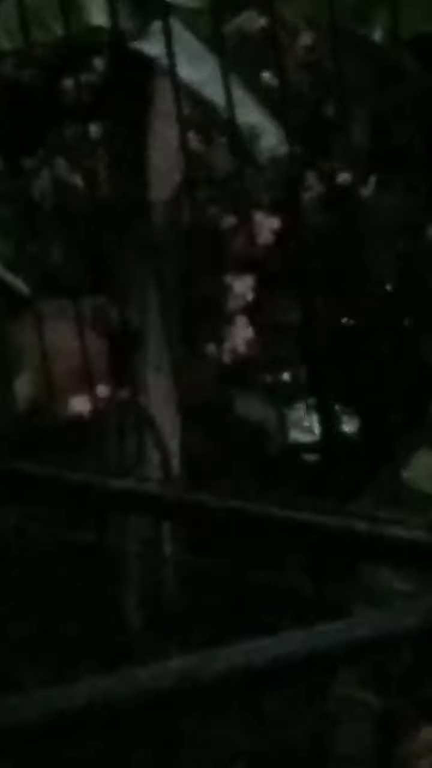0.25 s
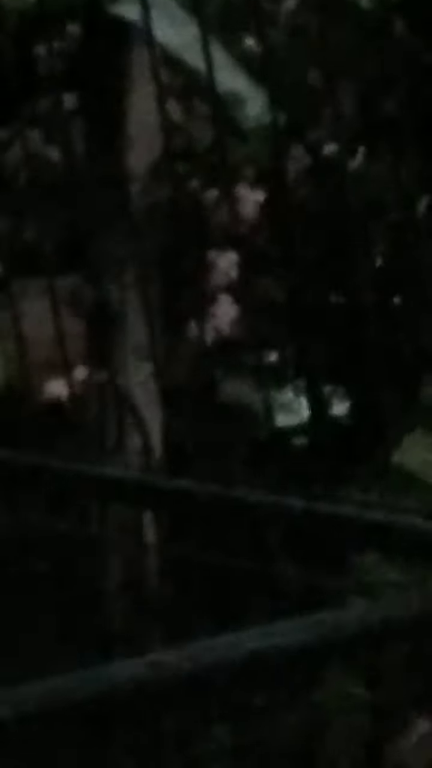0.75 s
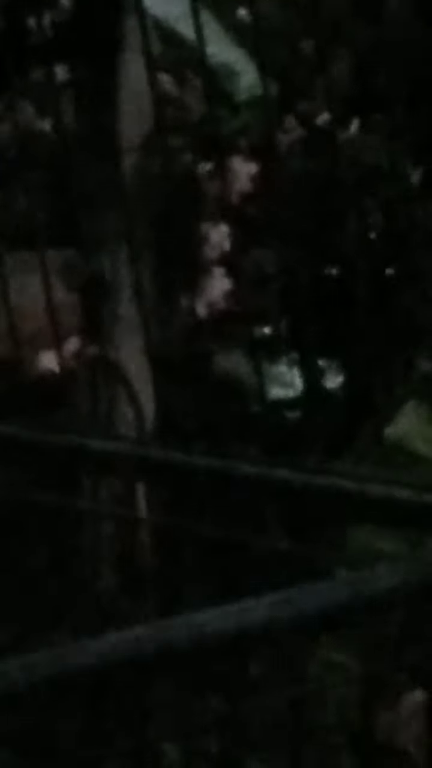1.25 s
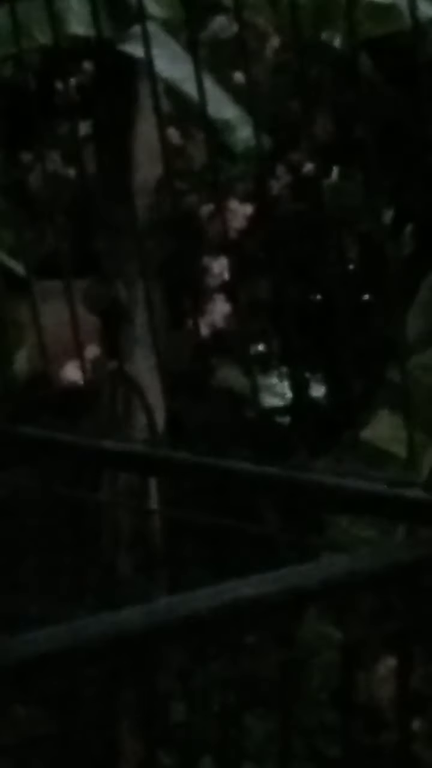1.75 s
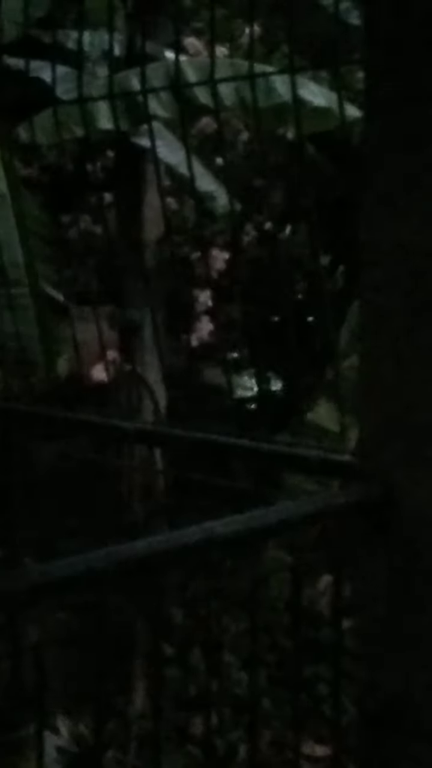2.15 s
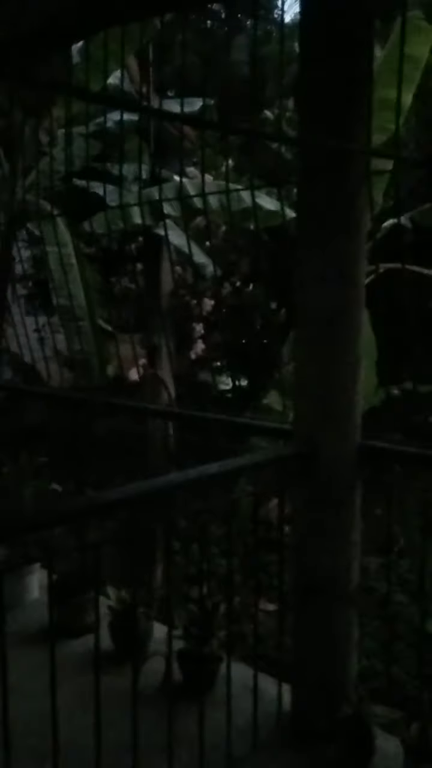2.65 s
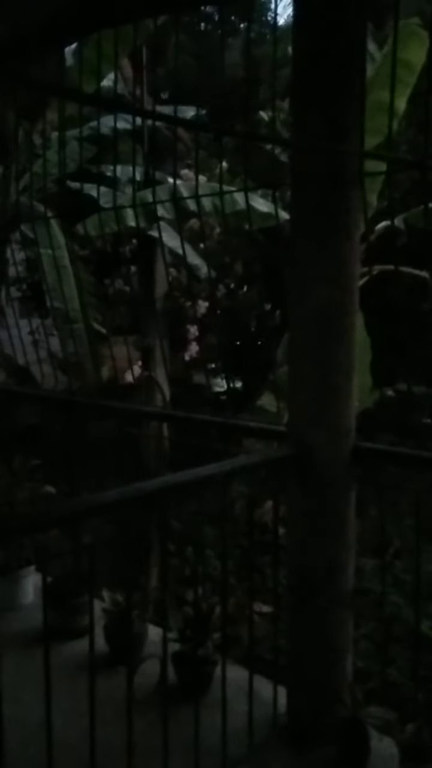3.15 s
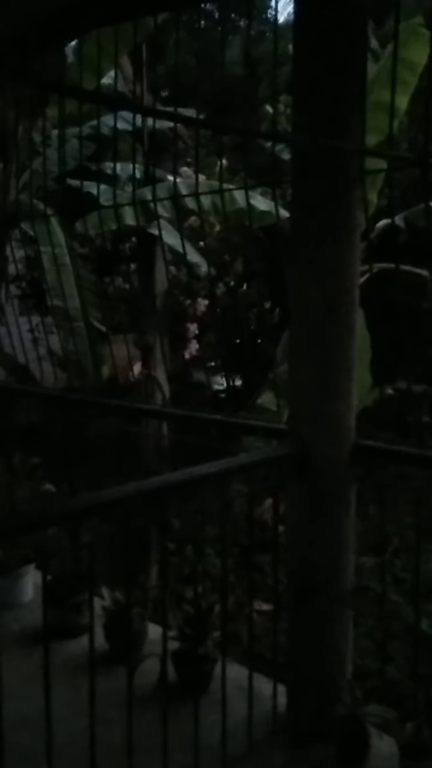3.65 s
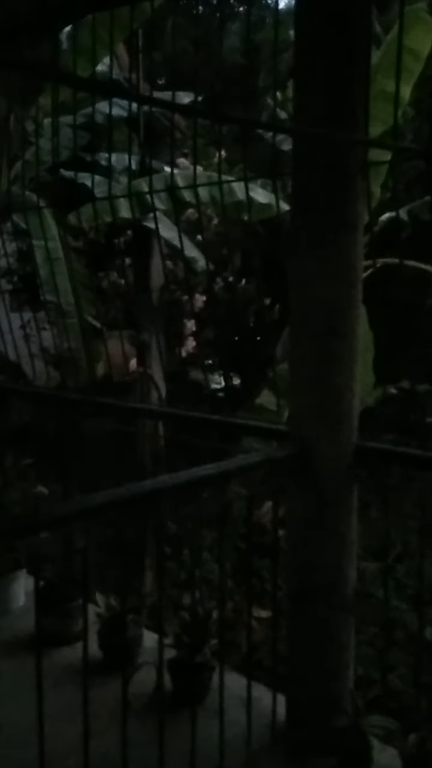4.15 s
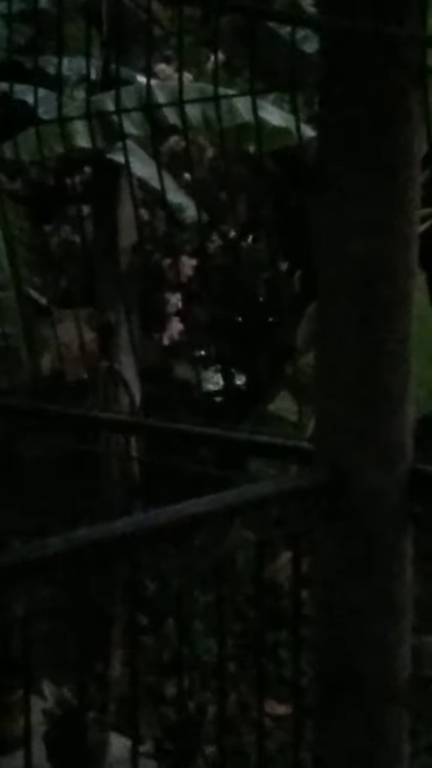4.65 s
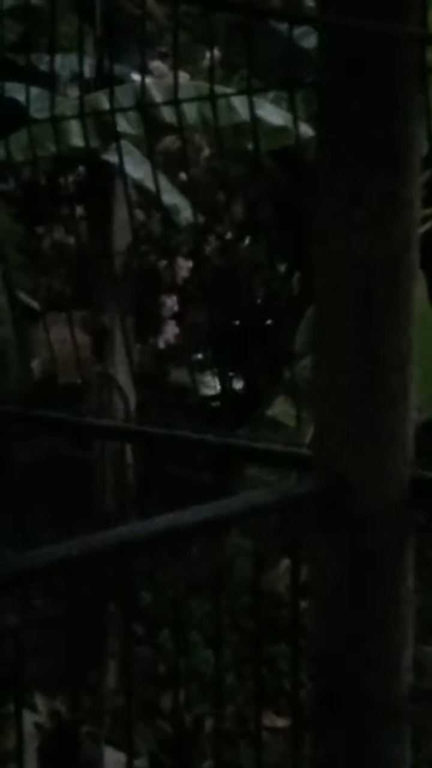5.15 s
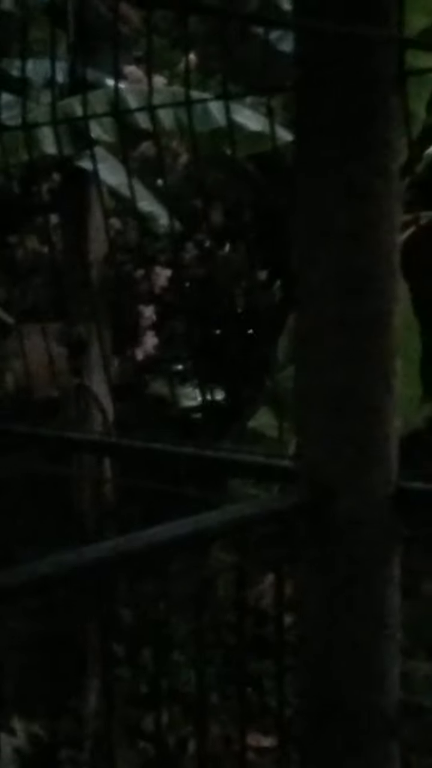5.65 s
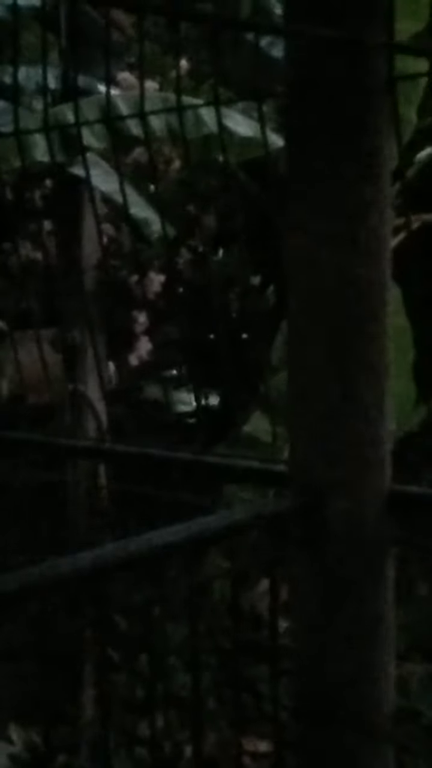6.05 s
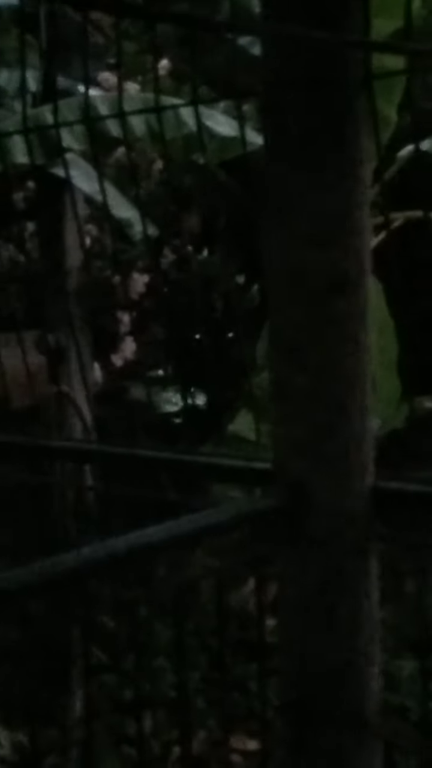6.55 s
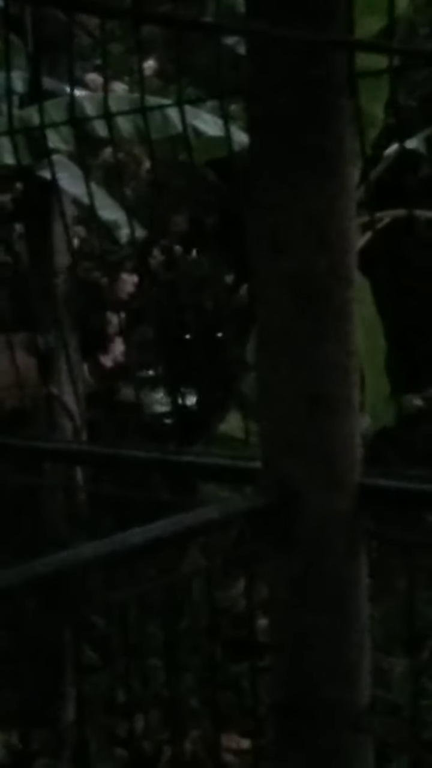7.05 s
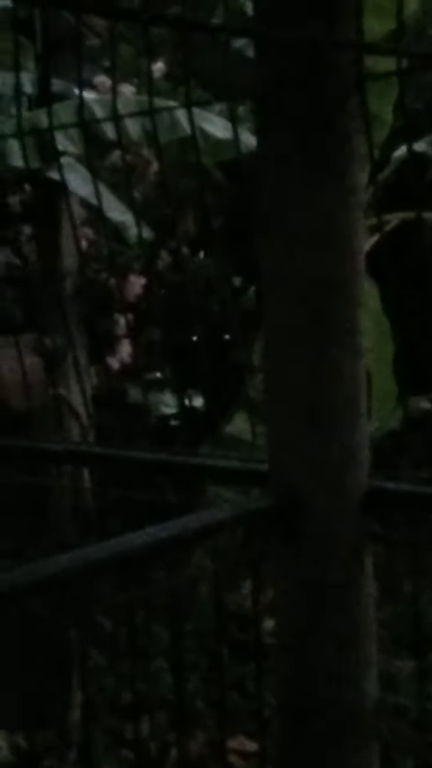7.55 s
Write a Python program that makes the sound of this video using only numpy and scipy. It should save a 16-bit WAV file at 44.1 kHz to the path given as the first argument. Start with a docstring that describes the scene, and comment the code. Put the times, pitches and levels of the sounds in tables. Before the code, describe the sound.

A soft wet wash, a breathy high hum and a fine patter of far drips run throughout, outdoors in a leafy garden at dawn, heard from a porch. From 0 s, near drops fall irregularly: bright splats with tiny scattered droplets, a strong one at 0.25 s and more from 0.6 to 1 s, mixed with dull leaf pats and short ringing puddle plops. Splats continue around 1.8, 2.0 and 2.6 s, then 3.3 to 3.9 s. The loudest event is a tight cluster of sharp splats at about 4.26 s, followed by leaf knocks near 4.7 s. Between 5.1 and 5.8 s it is sparser, with small plops. Moderate splats return at 5.9 s, and from 6.4 s to the end lighter, more echoing drops tick quickly. The hum swells gently near 0.6, 4.6, 6.4 and 7.1 s; the wash eases slightly. Walls give every drop a brief reflection.

```python
"""A soft wet wash and a high, breathy, swelling hum run throughout, together with a patter of far drips.
Close to the porch, drops splat brightly on wet surfaces, pat on broad leaves and plop into puddles;
the porch walls answer each one. It is a garden at dawn, dripping from wet leaves and eaves.
Wash and hum are filtered noise; splats are resonant clicks; plops, pats and most far drips are damped
tones. Each drip carries a random echo of its own spot."""
import sys
import numpy as np
from scipy import signal
from scipy.fft import rfft, irfft, next_fast_len
from scipy.io import wavfile
from scipy.ndimage import uniform_filter1d, map_coordinates

SR = 44100
rng = np.random.default_rng(int(sys.argv[2]) if len(sys.argv) > 2 else 0)


def pcm_store(signal):
    """Save signal as 16-bit PCM."""
    levels = np.round(np.clip(np.atleast_2d(signal), -1, 1) * 32767)
    wavfile.write(sys.argv[1], SR, levels.astype(np.int16).T)


N = 344421

# colour of the far drips, before the shared ringing: [f/Hz, relative level/dB]
FAR_COLOUR = [(1000, -22), (2800, -1.5), (4200, -9), (4900, -8), (6000, -4.5), (7000, 4.5), (8300, 0.5),
              (9200, -3.5), (11300, -13.5), (12200, -46), (15500, -33)]


def amp(db):
    """Decibels to gain."""
    return 10 ** (np.asarray(db) / 20)


def unit(x):
    """Scale to rms 1."""
    return x / np.sqrt(np.mean(x ** 2) + 1e-20)


def along(points, hz):
    """Read (f/Hz, value) points on a log frequency axis."""
    f, value = np.transpose(points)
    return np.interp(np.log(hz + 1), np.log(f + 1), value)


def wobble(rate):
    """A smooth random curve with this many knots a second."""
    knots = rng.standard_normal(int(N * rate / SR) + 4)
    return map_coordinates(knots, [np.arange(N) * rate / SR])


def filtered(x, response):
    """Multiply the spectrum of x by a response of frequency."""
    size = next_fast_len(len(x) + 8192)
    spectrum = rfft(x, size) * response(np.fft.rfftfreq(size, 1 / SR))
    return irfft(spectrum, size)[:len(x)]


def add(track, s, sound):
    """Mix a sound into the track from time s."""
    part = track[max(round(s * SR), 0):][:len(sound)]
    part += sound[:len(part)]


def air():
    """The soft wash of the wet garden: coloured noise that wavers slightly and slowly eases off."""
    # colour of the far wet garden: [f/Hz, relative level/dB per Hz]
    air_colour = [(20, -21), (45, -8.5), (70, 0), (110, -1), (230, -5.5), (400, 1), (800, -4), (1500, -3.5),
                  (2900, -6), (4200, -7.5), (4900, -10), (7900, -2.5), (11300, -21.5), (12300, -31),
                  (15500, -26)]
    start_db, fade_db_per_s = -56, 0.42
    wash = unit(filtered(rng.standard_normal(N), lambda hz: amp(along(air_colour, hz))))
    return wash * amp(start_db - fade_db_per_s * np.arange(N) / SR + 0.71 * wobble(20))


def hum():
    """Noise sings in narrow resonances; mainly the lower ones swell together, and each flutters alone."""
    # resonances: [f/Hz, nominal width/Hz, level/dB before swell and flutter, share of the swells]
    resonances = [(1438, 71, -65, 1.05), (1715, 30, -70, 1.66), (2029, 98, -60.5, 1.07),
                  (2449, 73, -56, 0.053), (4166, 250, -69, 0.16), (6400, 29, -77, 0.25)]
    # slow swells, of which only the departure from the mean counts: [t/s, level/dB]
    swell_points = [(0.0, -59.5), (0.63, -54.5), (0.85, -59.5), (2.17, -60), (2.58, -58.5), (3.26, -60),
                    (3.69, -60), (4.58, -54.5), (5.28, -58), (5.52, -64.5), (6.41, -55), (6.73, -57.5),
                    (7.13, -55), (7.8, -58.5)]
    out = np.zeros(N)
    level_db = np.interp(np.arange(N) / SR, *np.transpose(swell_points))
    swell_db = level_db - level_db.mean()
    for centre, width, db, share in resonances:
        band = filtered(rng.standard_normal(N),
                        lambda hz: (1 + ((hz - centre) / (1.08 * width)) ** 2) ** -1.5)
        drift_db = 2.1 * wobble(6)
        flutter_db = 4.03 * wobble(24)
        out += unit(band) * amp(db + share * (swell_db + drift_db) + flutter_db)
    return out


def click(colour, ripple_db, ripple_hz, size=1024):
    """A causal pulse of (f/Hz, level/dB) colour with random resonances about ripple_hz apart."""
    hz = np.fft.rfftfreq(size, 1 / SR)
    curve = map_coordinates(rng.standard_normal(size), [hz / ripple_hz], mode="mirror")
    ripple = amp(ripple_db * np.tanh(curve))
    ripple /= np.sqrt(uniform_filter1d(ripple ** 2, size=41))  # resonances only regroup the energy nearby
    # folding the cepstrum forward in time gives minimum phase
    cepstrum = irfft(np.log(amp(along(colour, hz)) * ripple))
    fold = 1 + np.sign(size / 2 - np.arange(size))
    fold[0] = 1
    return irfft(np.exp(rfft(cepstrum * fold)))


def ring(hz, cycles, glide):
    """A damped tone that lives a few cycles while its pitch glides by a fraction of itself."""
    t = np.arange(SR // 20) / SR
    age = hz * t / cycles
    pitch = hz * (1 + glide * (1 - np.exp(-age)))
    envelope = np.exp(-age) * (1 - np.exp(-6 * age))
    return np.sin(2 * np.pi * np.cumsum(pitch) / SR) * envelope


def porch(sound, early_db, early_t60, tail_db, count=8):
    """Echoes of the sound's own spot: a few walls, scatter off leaves and rails, a diffuse tail."""
    # how long the diffuse tail lasts: [f/Hz, t60/s]
    tail_t60 = [(300, 0.28), (2000, 0.27), (7000, 0.24), (13000, 0.38)]
    t = np.arange(SR // 3) / SR
    hz, frames, z = signal.stft(rng.standard_normal(len(t)), SR, nperseg=256)
    decay = amp(-60 * frames / along(tail_t60, hz)[:, None])
    tail = signal.istft(z * decay, SR, nperseg=256)[1][:len(t)]
    tail *= 1 - np.exp(-t / 0.0023)  # the tail builds up softly
    early = rng.standard_normal(len(t))
    walls = (rng.uniform(.003, .024, count) * SR).astype(int)  # delays of 3 to 24 ms
    early[walls] += 8 * rng.standard_normal(count)
    early *= amp(-60 * t / early_t60)
    echo = amp(early_db) * early / np.linalg.norm(early) + amp(tail_db) * tail / np.linalg.norm(tail)
    echo[0] += 1  # the direct sound
    return signal.fftconvolve(sound, echo)


def ringing(hz):
    """Causal response that lifts and prolongs a few fixed pitches."""
    # ringing that the bright drips share: [f/Hz, width/Hz, level/dB over the direct sound]
    modes = [(3540, 45, 2), (4260, 90, 4), (5230, 90, 2), (6290, 60, 2), (7200, 40, -1), (7780, 60, 0),
             (8220, 200, 2)]
    return 1 + sum(amp(db) * 1j * hz * width / (centre ** 2 - hz ** 2 + 1j * hz * width)
                   for centre, width, db in modes)


def far_drips(count, hz, spread, cycles, scatter_db, size=14):
    """Many small damped tones from `size` spots in the garden, mostly echo; rms 1."""
    spots = np.zeros((size, N))
    for k, (when, weight, pitch) in enumerate(rng.random((count, 3))):
        drip = ring(hz * np.exp(spread * (2 * pitch - 1)), cycles, glide=0)
        s = (k + when) / count * N / SR
        add(spots[k % size], s, amp(scatter_db * weight) * unit(drip))
    return unit(sum(porch(spot, early_db=11.5, early_t60=0.076, tail_db=9.5)[:N] for spot in spots))


def far_ticks(count=160):
    """Tiny splashes among the leaves, each ringing at several pitches of its own; rms 1."""
    out = np.zeros(N)
    for k, (when, weight, tilt) in enumerate(rng.random((count, 3))):
        tilt_db = 7 * (2 * tilt - 1)  # per octave
        colour = [(hz, db + tilt_db * np.log2(hz / 6500)) for hz, db in FAR_COLOUR]
        tick = porch(click(colour, ripple_db=13, ripple_hz=170.1), early_db=6.5, early_t60=0.031, tail_db=6.5)
        add(out, (k + when) / count * N / SR, amp(47 * weight) * unit(tick))
    return unit(out)


def patter():
    """Far ticks, pings, tiny droplets, plops and leaf pats blend into a bed."""
    # colour of the tiniest droplets: [f/Hz, relative level/dB]
    glint_colour = [(5000, -7.5), (8000, -1), (9300, -5), (11300, -10.5), (12300, -24), (15500, -26)]
    pings = far_drips(count=700, hz=5972, spread=.72, cycles=35, scatter_db=21, size=8)
    pings = unit(filtered(pings, lambda hz: amp(along(FAR_COLOUR, hz)) * ringing(hz)))
    glints = far_drips(count=600, hz=9283, spread=.5, cycles=61, scatter_db=28, size=6)
    glints = unit(filtered(glints, lambda hz: amp(along(glint_colour, hz))))
    ticks = unit(filtered(far_ticks(), ringing))
    puddles = far_drips(count=110, hz=1470, spread=0.629, cycles=8.6, scatter_db=7.5, size=5)
    leaves = far_drips(count=100, hz=432, spread=0.41, cycles=3.0, scatter_db=10, size=4)
    thumps = far_drips(count=45, hz=89.8, spread=0.554, cycles=2.3, scatter_db=15, size=2)
    return (amp(-58.0) * ticks + amp(-56.5) * pings + amp(-57.5) * glints
            + amp(-65.5) * puddles + amp(-65.5) * leaves + amp(-75.0) * thumps)


def sized(sound, db):
    """Scale a drop so that its energy, spread over 40 ms, has this rms level."""
    return amp(db) * np.sqrt(SR / 25) * sound / np.linalg.norm(sound)


def splat_colour(centre, width):
    """(f/Hz, level/dB) points of one hump with soft skirts, inside the band that all splats share."""
    # the band that all splats share: [f/Hz, relative level/dB]
    splat_band = [(1000, -24), (2600, -4), (3600, 7), (5500, -6), (8000, 0), (10500, -5), (12300, -14),
                  (15500, -20)]
    skirt_db, top_breadth = 43, 3.85  # fall per decade of the skirt term; breadth in squared widths
    hz = np.geomspace(500, 16000, 80)
    away = np.log2(hz / centre) / width
    fall_db = skirt_db * np.log10(1 + away ** 2 / top_breadth)
    return np.column_stack([hz, along(splat_band, hz) - fall_db])


def spatter(centre, width, count=4):
    """Droplets thrown from a splat, weaker the later they land, each ringing at pitches of its own."""
    latest_s, scatter_db = 0.06, 11
    out = np.zeros(SR // 6)
    for when in rng.random(count):
        droplet = click(splat_colour(centre, 1.47 * width), ripple_db=19, ripple_hz=189.5)
        add(out, when * latest_s, amp(-scatter_db * when) * unit(droplet))
    return porch(out, early_db=-2, early_t60=0.089, tail_db=-4)


def splats():
    """A short soft noise rises into each slap, which rings at a few pitches; droplets land just after."""
    # near drops that burst on wet surfaces, levels before the trims here and in the mix:
    # [t/s, rms level/dB over 40 ms, echo level/dB over direct, centre f/Hz, colour width/octaves]
    splat_drops = [(0.029, -43, -6, 7700, 0.26), (0.122, -42, 1, 8750, 0.38), (0.2534, -32, -7, 6850, 0.21),
                   (0.3, -48, -9, 7650, 0.27), (0.4434, -48, -1.0, 3900.0, 0.2),
                   (0.641, -34.5, 1, 5500, 0.3), (0.813, -34.5, -3, 8500, 0.3),
                   (0.8904, -42.0, -4, 7000.0, 0.26), (0.9987, -35, -5.5, 5730, 0.2),
                   (1.0792, -47.0, -9, 9000, 0.36), (1.1292, -46.5, 3.0, 8200, 0.13),
                   (1.633, -40.5, -2, 6450, 0.16), (1.6833, -46, -13, 7240, 0.039),
                   (1.8149, -34.5, -6, 6670, 0.16), (2.0213, -36, 2, 7000, 0.38),
                   (2.159, -44.5, 1, 5400, 0.51), (2.3766, -48.5, -9, 6000, 0.19),
                   (2.4052, -42, -1, 6560, 0.11), (2.4445, -44.5, 0, 6700, 0.28),
                   (2.467, -49, -2, 5400, 0.24), (2.6281, -36, -2.5, 6600.0, 0.47),
                   (2.6872, -38, -5.5, 4950, 0.65), (3.32, -37, -4, 6400, 0.35),
                   (3.3964, -36, 4.0, 5900, 0.49), (3.431, -42.0, 5, 6430, 0.13),
                   (3.793, -35, -3.5, 8850, 0.11), (3.9272, -38, -3.5, 6670, 0.32),
                   (3.9922, -42, -9, 7150, 0.12), (4.0833, -47, -5, 6500, 0.056),
                   (4.2154, -44, 5, 6950, 0.37), (4.261, -28.5, 0, 6300, 0.39),
                   (4.2679, -27, -8, 6370, 0.22), (4.2733, -26, -7, 6550, 0.19),
                   (4.3632, -37, -5, 7500, 0.22), (4.407, -36, -1, 7860, 0.052),
                   (4.6318, -37, 3.0, 5700, 0.17), (4.7272, -43, -16, 7150, 0.074),
                   (4.8812, -46, 5.0, 7200, 0.075), (5.032, -42.5, 7, 6460, 0.16),
                   (5.074, -47, -6, 7100, 0.1), (5.8646, -37.5, 3, 8200, 0.14),
                   (5.9066, -51, 11, 7600, 0.37), (6.077, -46.5, -8, 8000, 0.083),
                   (6.435, -41.5, 16, 7450, 0.092), (6.4741, -40.5, -1, 5300, 0.66),
                   (6.514, -45.5, -5, 6300, 0.22), (6.699, -39.5, -7, 6850, 0.043),
                   (6.9587, -44, -2, 6800.0, 0.22), (7.007, -48, -1, 7900, 0.28),
                   (7.0974, -44, 6, 8300, 0.028), (7.249, -37, 2, 7100, 0.2),
                   (7.3228, -39.5, 4, 7340, 0.72), (7.39, -41, 11, 7200, 0.29),
                   (7.4895, -45.5, 19, 7400, 0.24), (7.5882, -42.5, 1, 6800.0, 0.11),
                   (7.718, -40, 31, 7200, 0.19)]
    out = np.zeros(N)
    t = np.arange(SR // 100) / SR
    for s, db, echo_db, centre, width in splat_drops:
        slap = click(splat_colour(centre, width), ripple_db=18, ripple_hz=330.2)
        spray = 0.13 * rng.standard_normal(len(t)) * np.exp(-t / 0.0016)
        spray[0] = 1
        splat = porch(np.convolve(slap, spray), early_db=echo_db + 1.5, early_t60=0.27, tail_db=echo_db + 2.8)
        add(out, s, sized(splat, db + 0.26))
        rising_noise = rng.standard_normal(len(t)) * np.exp(-t[::-1] / 0.0068)
        lead_in = np.convolve(slap, rising_noise)
        add(out, s - t[-1], sized(lead_in, db - 15))
        add(out, s, sized(spatter(centre, width), db - 11.5))
    return out


def further_drops(count, db, scatter_db, low_hz, high_hz):
    """Rows [t/s, level/dB, f/Hz] of further soft drops, one at random in each equal slot of time."""
    when, weight, pitch = rng.random((count, 3)).T
    s = (np.arange(count) + when) / count * N / SR
    return list(zip(s, db - scatter_db * weight, low_hz * (high_hz / low_hz) ** pitch))


def pats():
    """A broad leaf gives a dull, heavily damped knock that sinks slightly in pitch."""
    # placed low knocks, loud and soft: [t/s, rms level/dB over 40 ms before a 1 dB lift, f/Hz]
    leaf_drops = [(0.142, -64, 170.0), (0.257, -62.5, 750), (0.709, -49.5, 452), (0.808, -53.5, 424),
                  (1.222, -54.5, 410.0), (1.937, -56.5, 363), (2.044, -51.0, 725), (2.081, -56.5, 430.0),
                  (2.762, -56.5, 560.0), (3.053, -53, 425), (3.1, -56, 394), (3.433, -54, 470),
                  (3.478, -55, 380.0), (3.564, -50.5, 730), (3.7, -54, 414), (4.016, -50, 410),
                  (4.162, -50, 379), (4.285, -56.5, 594), (4.503, -59, 112), (4.635, -61.5, 900),
                  (4.71, -51, 383), (4.75, -48, 483), (4.79, -54.5, 500.0), (5.023, -53.0, 498),
                  (5.125, -62, 153), (5.306, -57.0, 158), (6.109, -57.0, 602), (6.893, -53.5, 396),
                  (7.266, -60, 343), (7.283, -58, 555), (7.379, -57, 614), (7.482, -54, 666)]
    out = np.zeros(N)
    further = further_drops(count=16, db=-56.0, scatter_db=6, low_hz=374, high_hz=934)
    for s, db, hz in list(leaf_drops) + further:
        knock = porch(ring(hz, cycles=3.4, glide=-0.014), early_db=5.0, early_t60=0.033, tail_db=6.5)
        add(out, s, sized(knock, db + 1.0))
    return out


def plops():
    """A small bubble rings briefly, rising in pitch, inside the wet smack that makes it."""
    # placed drops into water, loud and soft: [t/s, rms level/dB over 40 ms before a 1.5 dB lift, f/Hz]
    water_drops = [(0.297, -46.5, 1965), (0.438, -44.5, 3730), (0.494, -47.5, 4030), (0.529, -50.5, 2436),
                   (1.0, -49.5, 3390), (1.059, -48, 2040), (1.162, -48.5, 1182), (1.164, -53, 1703),
                   (1.282, -52, 4130), (1.38, -58, 4230), (1.808, -45.5, 1916), (1.817, -54, 2920),
                   (2.014, -46, 1946), (2.018, -44, 2290), (2.161, -50, 3520), (2.317, -52, 3420),
                   (2.376, -47.5, 1647), (2.465, -50, 1630), (2.466, -55, 1215), (2.484, -55, 3040),
                   (2.6, -48.5, 2210), (2.605, -52, 4240), (2.763, -52, 1450.0), (2.987, -51.5, 3003),
                   (3.14, -57.0, 1466), (3.19, -55, 1430), (3.507, -49.5, 3450), (3.949, -46.5, 4390),
                   (3.95, -46, 2750), (4.46, -54, 2130), (4.465, -54, 1410), (4.584, -45.5, 2070),
                   (4.728, -47.5, 2015), (4.812, -51.5, 2210), (4.842, -56.5, 4260), (4.98, -50.5, 1213),
                   (5.116, -53.0, 3220), (5.142, -52, 2180), (5.21, -52.5, 4120), (5.267, -54, 2930),
                   (5.673, -51, 4260), (6.208, -48.0, 2107), (6.236, -49, 1407), (6.262, -49.0, 2250),
                   (6.345, -51, 3500), (6.415, -55.5, 3080.0), (6.476, -45.5, 4220), (6.484, -50, 2620.0),
                   (6.68, -54, 2130), (6.778, -55.5, 2830), (7.007, -54.5, 3220), (7.111, -56, 2380),
                   (7.253, -52.5, 4150.0), (7.321, -49, 2350), (7.429, -51.5, 1958), (7.735, -48, 4170),
                   (7.77, -46.0, 3650)]
    out = np.zeros(N)
    further = further_drops(count=20, db=-53.5, scatter_db=8, low_hz=2593, high_hz=4390)
    for s, db, hz in list(water_drops) + further:
        bubble = ring(hz, cycles=17.0, glide=0.0077)
        smack = 1.18 * ring(hz, cycles=3.5, glide=0)
        plop = porch(bubble + smack, early_db=5.0, early_t60=0.08, tail_db=5)
        add(out, s, sized(plop, db + 1.5))
    return out


def scene():
    """The whole garden, near and far, the same in both channels."""
    bed = air() + hum() + patter()
    bright = amp(-3.4) * filtered(splats(), ringing)
    garden = bed + bright + pats() + plops()
    return np.array([garden, garden])


def record(dry):
    """The recorder loses the deepest bass and keeps nothing above its band limit."""
    bass_hz, top_hz = 42, 15650
    return np.array([filtered(side, lambda hz: (hz < top_hz) * hz ** 2 / np.hypot(hz ** 2, bass_hz ** 2))
                     for side in dry])


dry = scene()
out = record(dry)
pcm_store(out)
```